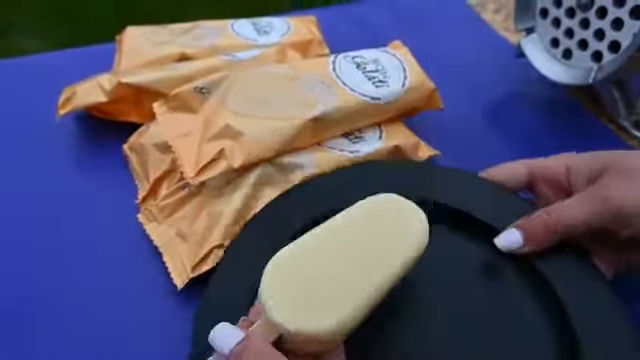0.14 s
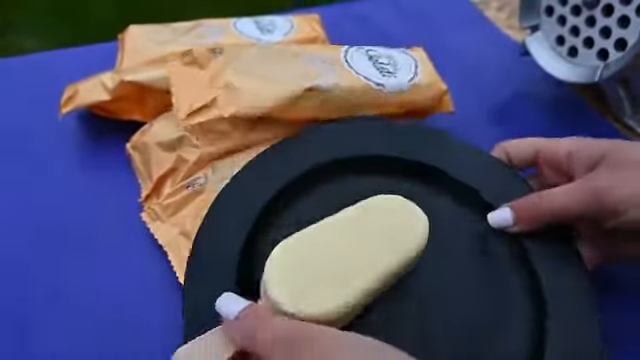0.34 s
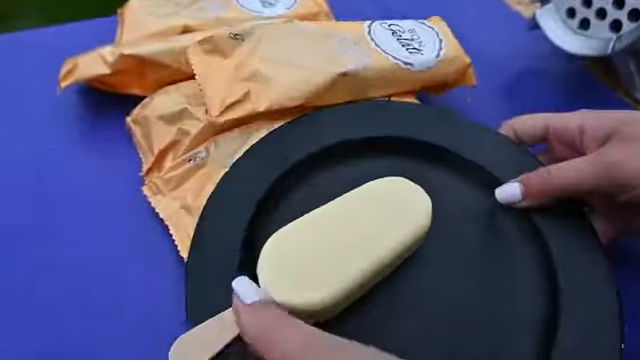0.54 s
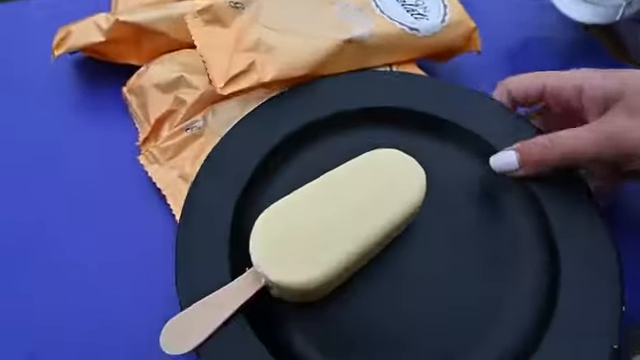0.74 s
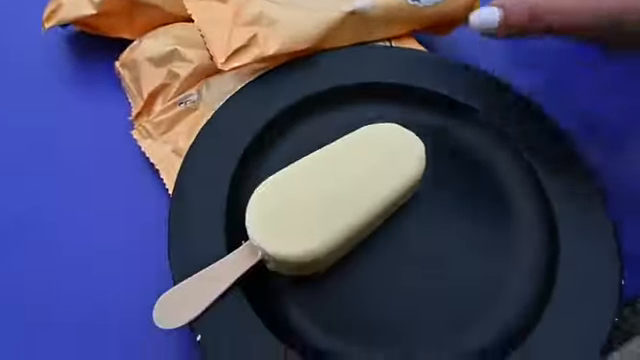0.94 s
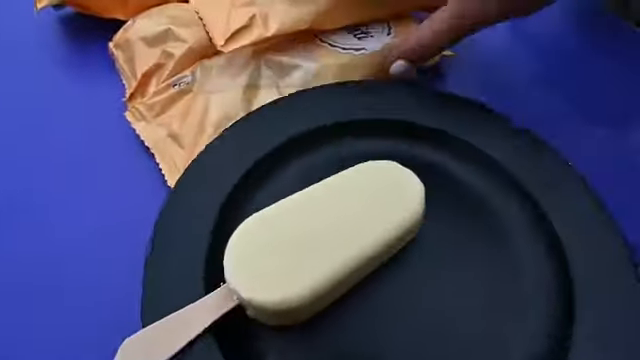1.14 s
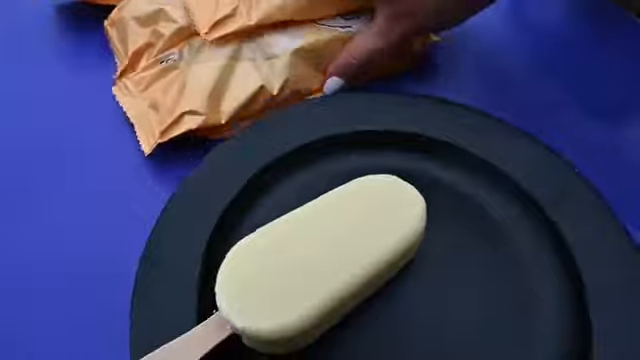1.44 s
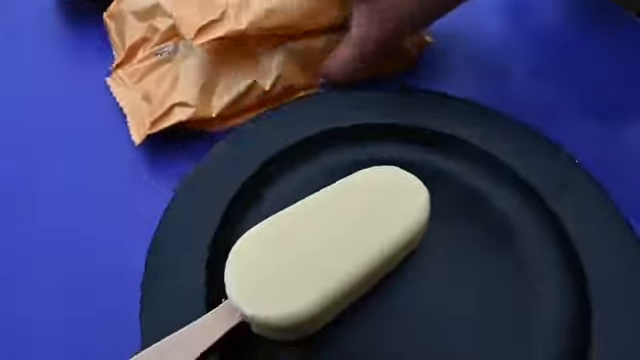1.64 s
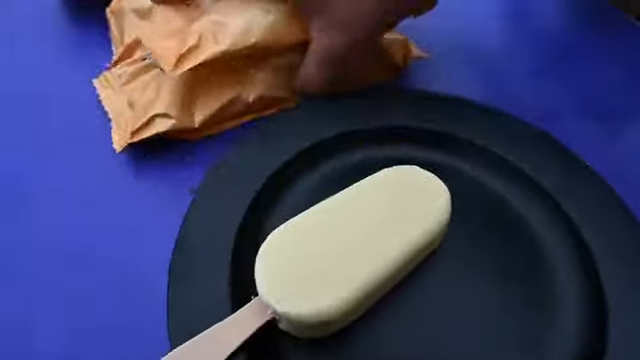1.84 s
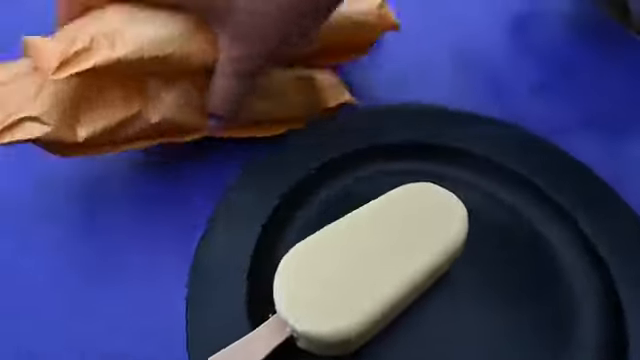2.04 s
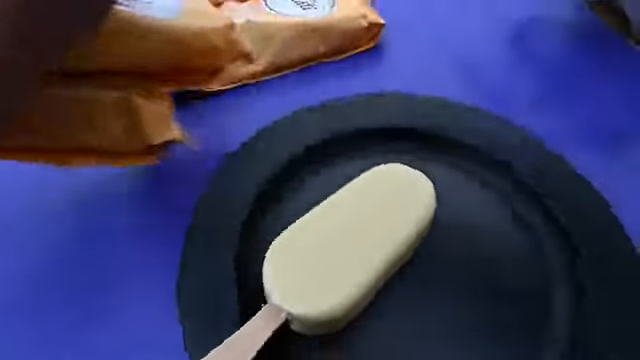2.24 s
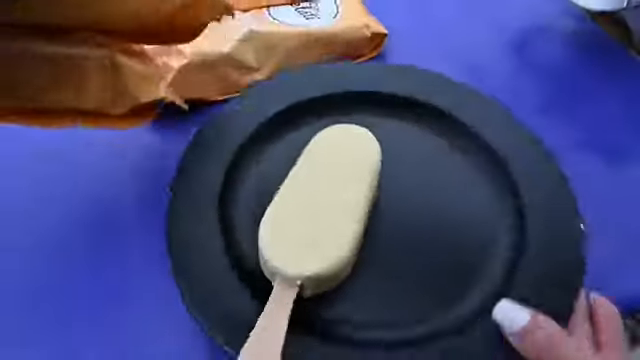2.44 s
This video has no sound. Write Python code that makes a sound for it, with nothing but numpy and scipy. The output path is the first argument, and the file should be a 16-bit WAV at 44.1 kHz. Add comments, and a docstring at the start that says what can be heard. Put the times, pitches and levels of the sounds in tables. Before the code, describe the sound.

Foil wrappers crackle close to a stereo microphone: a soft thud as an ice cream bar meets a plate, a short burst of snaps, a lull, then dense crinkling as a hand gathers them, fading at the end.

```python
"""Ice cream bar set down among foil wrappers

A hand sets an ice cream bar on a plate that slides over foil wrappers, then gathers the wrappers up.
The foil snaps and fizzes (bursts and grains of coloured noise), and air pockets in the wrappers pop hollowly
(short wobbly tones). Plate, table and bar thud (fading sine tones); light wind rumbles (filtered noise)."""
import sys
import numpy as np
from scipy import signal
from scipy.fft import rfft, irfft, next_fast_len
from scipy.io import wavfile
from scipy.ndimage import uniform_filter1d

SR = 44100
rng = np.random.default_rng(int(sys.argv[2]) if len(sys.argv) > 2 else 0)


def generate_wav(sig):
    """Save sig (samples, or channels by samples) to the path in sys.argv[1] as 16-bit PCM at SR."""
    pcm = np.round(np.clip(np.atleast_2d(sig).T, -1, 1) * 32767).astype(np.int16)
    wavfile.write(sys.argv[1], SR, pcm)


N = 114660  # length in samples, 2.6 s

# The general tone of crinkling foil. Each row: frequency in Hz, relative level in dB.
FOIL_TONE = [(180, -57), (300, 0.5), (1100, -1.5), (1480, -4), (3190, -5.5), (3950, -7), (10400, -6),
             (14500, -9), (16000, -30)]
DIFFUSE = 3.8  # for sounds from all around: the left-right likeness is raised to this power


def snaps():
    """Foil creases snap: each swells, ticks and dies as a short noise burst coloured around its centre."""
    # Single snaps. Each row: time in seconds (the tick comes 1.2 ms later), level in dB, colour centre in Hz.
    snap_rows = [(0.1037, -27.5, 6600), (0.2458, -19.5, 3360), (0.2656, -20.5, 5800), (0.311, -19, 3540),
                 (0.3243, -12, 7900), (0.361, -24, 6620), (0.3651, -7.5, 11300), (0.371, -13, 6300),
                 (0.3815, -9, 6950), (0.5025, -17.5, 6000), (0.5256, -30, 4960), (0.5492, -29, 8120),
                 (0.599, -33, 3500), (0.6293, -14, 11100), (0.6359, -17, 6350), (0.9887, -43.5, 11600),
                 (1.2067, -25, 8190), (1.2357, -25, 6060), (1.2833, -26, 3600), (1.2993, -20, 5800),
                 (1.316, -29, 6250), (1.3304, -30, 2530), (1.3478, -19.5, 5850), (1.4288, -14, 10800),
                 (1.454, -23, 5100), (1.4598, -21.5, 8900), (1.4764, -18.5, 5340), (1.4817, -13, 7700),
                 (1.4942, -20, 7990), (1.5121, -13, 2520), (1.5191, -6, 10500), (1.523, -16, 7100),
                 (1.5549, -12.5, 3560), (1.5946, -21, 11100), (1.6065, -9, 3500), (1.623, -14, 6000),
                 (1.6259, -14.5, 5940), (1.6477, -19.5, 4380), (1.6701, -17, 3260), (1.6811, -10, 7400),
                 (1.6838, -22, 3520), (1.7055, -24, 5300), (1.715, -19.5, 8950), (1.7227, -12, 7800),
                 (1.7428, -19, 6800), (1.7716, -11, 5060), (1.7754, -13.5, 2500), (1.7866, -21, 5000),
                 (1.7926, -10, 6000), (1.804, -11, 5340), (1.8089, -9.5, 6100), (1.8242, -21.5, 5400),
                 (1.838, -21.5, 5470), (1.8552, -21, 5130), (1.8608, -18.5, 4000), (1.9442, -19, 3870),
                 (1.9727, -20.5, 3670), (1.9892, -17.5, 5100), (2.0013, -7, 6060), (2.0082, -11.5, 9050),
                 (2.0328, -20, 8100), (2.0534, -21.5, 3180), (2.0805, -10.5, 4920), (2.0948, -19, 4870),
                 (2.1878, -16, 4100), (2.234, -31, 2500), (2.2512, -22.5, 6600), (2.308, -20, 11900),
                 (2.3367, -24.5, 3580), (2.3426, -24, 2180), (2.3671, -23, 6400), (2.5062, -33, 1980),
                 (2.59, -25, 7700)]
    swell_s, swell_db = 0.001, -10  # the swell before the tick
    tick_s, tick_db = 0.0004, 3
    t60, tail_t60, tail_db = 0.015, 0.05, -15  # seconds to fall by 60 dB; the tail is weaker
    ragged_db, ripple_db = 4, 4  # typical unevenness in time and over frequency
    centre_octaves, floor_db, floor_low_hz = 0.52, 4.5, 880  # width of the centre; broad floor under it
    out, lead = np.zeros((2, N)), 512  # lead: samples before the tick
    t = (np.arange(4096) - lead) / SR
    after = np.maximum(t, 0)
    swell = gain_of(swell_db) * np.exp(t / swell_s)
    shape = np.where(t < 0, swell, gain_of(-60 * after / t60))
    shape = shape * (1 + gain_of(tick_db) * np.exp(-abs(t) / tick_s))
    shape = shape + gain_of(tail_db) * fall(after, tail_t60, 0.002)
    for s, db, centre_hz in snap_rows:
        ripple = ripple_db * wander(len(t) // 2 + 1, 60)
        ragged = gain_of(ragged_db * wander(len(t), 30))  # the crease gives way in jerks

        def crease_tone(hz):
            """A broad floor without bass plus a bump at the centre, both in the foil's tone."""
            floor = gain_of(floor_db) * hz ** 2 / (hz ** 2 + floor_low_hz ** 2)
            return gain_of(read(FOIL_TONE, hz) + ripple) * (floor + hump(hz, centre_hz, centre_octaves))

        burst = colour(shape * ragged * rng.standard_normal((2, len(t))), crease_tone)
        # Scale by the strongest 3 ms, leaving room for peaks.
        burst /= np.sqrt(uniform_filter1d(burst ** 2, 130).max(1, keepdims=True) * 5)
        add(out, s + 0.001201 - lead / SR, gain_of(db) * burst)
    return out


def fizz():
    """Countless small creases of differing colour over a smoother rustle."""
    # Colours of the tiny creases: a list of centres in Hz.
    grain_centres = [1300, 2200, 3300, 5000, 7500, 11500]
    grains_per_s, spread_db, grain_t60, grain_octaves = 1600, 4, 0.009, 0.86  # the rate is for all colours together
    smooth_db, flutter_db = -5.5, 0.5
    calm = 0.4  # below 1, the crackle's share changes less than the movement
    t, grains = np.arange(1500) / SR, np.zeros((2, N))
    level = motion(column=1)
    busy = (level / level.max()) ** calm  # slow movement rustles, fast movement crackles
    for centre_hz in grain_centres:
        hits = clicks(grains_per_s / len(grain_centres), spread_db)
        power = signal.oaconvolve(hits ** 2, fall(t, grain_t60, 0.00024) ** 2)[:N]
        noise = evened(np.sqrt(power.clip(0))) * rng.standard_normal((2, N))
        grains = grains + busy * colour(noise, lambda hz: hump(hz, centre_hz, grain_octaves))
    smooth = gain_of(smooth_db) * ports(*rng.standard_normal((2, N)), DIFFUSE)
    foil = ports(*grains) + smooth
    foil = foil * gain_of(flutter_db * busy * wander(N, 300, passes=2))  # clumps
    foil = colour(foil, lambda hz: gain_of(read(FOIL_TONE, hz)))
    # Level out slow changes, then follow the movement.
    return level * foil / np.sqrt(uniform_filter1d((foil ** 2).mean(0), size=4000))


def pops():
    """Trapped air pockets ring for a few cycles, mostly near 1 kHz, with a slightly wobbling phase."""
    # Hollow pops. Each row: start in seconds, level in dB, pitch in Hz.
    pop_rows = [(0.268, -27.5, 1190), (0.314, -7, 1086), (0.327, -20.5, 1187), (0.373, -17, 1000),
                (0.381, -17, 1147), (0.387, -23, 1030), (0.506, -30, 970), (0.528, -31, 1130),
                (0.617, -21, 996), (0.629, -16, 1102), (0.636, -11, 988), (0.644, -17, 965),
                (0.686, -22.5, 915), (0.738, -22.5, 997), (0.748, -29.5, 1010), (0.893, -44, 1070),
                (1.207, -27, 1010), (1.224, -30, 980), (1.236, -19.5, 1183), (1.253, -20, 1380),
                (1.3, -26.5, 1780), (1.555, -18.5, 1020), (1.606, -27, 1025), (1.774, -23.5, 1250),
                (1.805, -23, 1077), (2.003, -21, 1225), (2.036, -26, 1020), (2.252, -25, 770)]
    t60, rise_s, wobble_radians = 0.017, 0.0024, 0.45
    out, t = np.zeros(N), np.arange(3000) / SR
    shape = fall(t, t60, rise_s)
    for s, db, hz in pop_rows:
        wobble = wobble_radians * wander(len(t), 50, passes=2)
        add(out, s, -gain_of(db) * shape / shape.max() * np.sin(2 * np.pi * hz * t + wobble))
    return out


def hollow_rustle():
    """Small air pockets rustle all the while: random clicks through one broad resonance."""
    per_s, spread_db, centre_hz, width_hz = 990, 3, 1140, 420
    rustle = clicks(per_s, spread_db) * rng.standard_normal(N)
    rustle = colour(rustle, lambda hz: 1 / (1 + ((hz - centre_hz) / (.5 * width_hz)) ** 2))
    return motion(column=2) * evened(rustle)


def thuds():
    """Plate and table ring briefly at each contact, as sums of fading tones."""
    # Plate meeting the table. Each row: start in seconds, dull table level in dB, plate ring level in dB.
    thud_rows = [(0.078, -29.5, -28), (0.223, -34, -35.5), (0.316, -27.5, -32), (0.373, -26, -26),
                 (0.511, -50, -36.5), (0.635, -31, -28), (0.686, -31, -40.5), (0.721, -40, -38.5),
                 (1.18, -50, -34), (1.284, -29.5, -31), (1.46, -56, -32.5), (1.52, -64, -35),
                 (1.608, -34, -51), (1.774, -28, -31), (1.899, -43, -41), (2.504, -40, -38.5)]
    # Dull low tones of the table. Each row: frequency in Hz, level in dB, seconds to fall by 60 dB.
    table_tones = [(80, 6, 0.066), (135, 2, 0.09)]
    # Ringing tones of the plate. Each row: frequency in Hz, level in dB, seconds to fall by 60 dB.
    plate_tones = [(240.3, 5, 0.1), (449, -4, 0.068), (595, 2.5, 0.033)]
    out, t = np.zeros(N), np.arange(12000) / SR
    for s, table_db, plate_db in thud_rows:
        table = gain_of(table_db) * ring(table_tones, t)
        add(out, s, table + gain_of(plate_db) * ring(plate_tones, t))
    return out


def bar_landing():
    """The soft bar lands: fading tones with the treble taken off."""
    # Tones of the landing. Each row: frequency in Hz, level in dB, seconds to fall by 60 dB.
    bar_tones = [(211, -3, 0.064), (346, -3, 0.11), (436, 4, 0.13), (627, -1.5, 0.084), (860, 28, 0.0046)]
    start_s, level_db, soft_hz = 0.0755, -23.5, 1700
    out, t = np.zeros(N), np.arange(12000) / SR
    dull = signal.butter(4, soft_hz, fs=SR, output="sos")
    add(out, start_s, gain_of(level_db) * signal.sosfilt(dull, ring(bar_tones, t)))
    return out


def sliding_tone():
    """A low tone sags in pitch as the plate slides."""
    # The slide, one row: start in seconds, length in seconds, first pitch in Hz, last pitch in Hz, level in dB.
    slide = (1.1, 0.24, 309, 230, -39.5)
    s, length, from_hz, to_hz, db = slide
    out = np.zeros(N)
    hz = np.linspace(from_hz, to_hz, round(length * SR))
    tone = np.sin(2 * np.pi * np.cumsum(hz) / SR)
    add(out, s, gain_of(db) * np.sqrt(np.hanning(len(hz))) * tone)  # fades in and out
    return out


def dragging():
    """Plate and table hum faintly while things drag: a narrow band of noise that follows the movement."""
    drag_db, hum_hz, octaves = -39.5, 241, 0.15  # level before the movement scales it down
    hum = colour(rng.standard_normal(N), lambda hz: hump(hz, hum_hz, octaves))
    return gain_of(drag_db) * np.sqrt(motion(column=1)) * evened(hum)


def air():
    """Light wind: noise with a low gusty rumble over a faint hiss."""
    # The tone of the air. Each row: frequency in Hz, relative level in dB.
    air_tone = [(20, 6.5), (45, -7.5), (80, -7), (200, -16), (450, -26), (1000, -43), (2500, -59),
                (15000, -60)]
    level_db, gust_db = -49.5, 1.5  # gust_db: typical swing of the rumble
    noise = colour(rng.standard_normal((2, N)), lambda hz: gain_of(read(air_tone, hz)) * (hz > 15))
    gust = gain_of(gust_db * wander(N, 4000, passes=2))
    low = colour(noise, lambda hz: 1 / (1 + (hz / 200) ** 2))
    return gain_of(level_db) * (noise - low + low * gust) / np.sqrt(np.mean(noise ** 2))


def motion(column):
    """How busily the foil moves, as a gain over time: column 1 for fizz, 2 for hollow rustle."""
    # Levels to glide between. Each row: time in seconds, fizz level in dB, hollow rustle level in dB.
    movement = [(0, -65.5, -70), (0.069, -57, -75), (.1, -42.5, -42), (.2, -47.5, -51.5), (.3, -39, -45),
                (.4, -40, -54), (0.479, -51.5, -52), (0.528, -39.5, -61), (.6, -47.5, -46),
                (.74, -50, -45.5), (.77, -55, -58.5), (.85, -52.5, -65.5), (1.04, -63.5, -72),
                (1.066, -51, -51), (1.177, -48, -52.5), (1.22, -36, -43), (1.35, -37, -49.5),
                (1.369, -44, -55), (1.429, -50.5, -54), (1.46, -33, -56), (1.59, -34, -58),
                (1.62, -26, -36.5), (1.7, -37.5, -63), (1.79, -27, -43), (1.869, -35, -53),
                (2.0, -34.5, -35), (2.13, -36, -50), (2.24, -35, -52), (2.27, -49, -49), (2.37, -46.5, -67),
                (2.4, -53.5, -57.5), (2.6, -50.5, -56)]
    rows = np.array(movement)
    return gain_of(np.interp(np.arange(N) / SR, rows[:, 0], rows[:, column]))


def clicks(per_s, spread_db):
    """Clicks at random moments, mostly small, a few large."""
    size = gain_of(spread_db * np.minimum(rng.exponential(1, N), 4))
    return size * (rng.random(N) < per_s / SR)


def ring(modes, t):
    """A struck body: fading tones, whose levels and pitches differ a little at every blow."""
    total = np.zeros(len(t))
    for hz, db, t60 in modes:
        gain = gain_of(db + 1.5 * rng.standard_normal())
        rise_s = 0.41 / hz
        shape = fall(t, t60, rise_s) * (1 - np.exp(-t / rise_s))  # an extra-soft start
        total += gain * shape * np.sin(2 * np.pi * hz * rng.uniform(0.96, 1.02) * t)
    return total


def fall(t, t60, rise_s):
    """Quick rise, then an exponential fall by 60 dB every t60 seconds."""
    return (1 - np.exp(-t / rise_s)) * gain_of(-60 * t / t60)


def wander(length, size, passes=1):
    """A smoothly wandering random curve of rms 1; size is the smoothing length in points."""
    curve = rng.standard_normal(length)
    for _ in range(passes):
        curve = uniform_filter1d(curve, size)
    return evened(curve)


def hump(hz, centre_hz, octaves):
    """Bell-shaped colour on a log frequency axis."""
    return np.exp(-.5 * (np.log2((hz + 1) / centre_hz) / octaves) ** 2)


def gain_of(db):
    """Turns dB into a gain."""
    return 10 ** (np.asarray(db) / 20)


def evened(x):
    """Scales to rms 1."""
    return x / np.sqrt(np.mean(x ** 2) + 1e-20)


def read(points, hz):
    """Reads a curve between its points on a log frequency axis."""
    f, value = np.transpose(points)
    return np.interp(np.log(hz + 1), np.log(f + 1), value)


def add(mix, s, sound):
    """Mixes a sound in at time s (seconds)."""
    part = mix[..., round(s * SR):][..., :sound.shape[-1]]
    part += sound[..., :part.shape[-1]]


def colour(x, gain):
    """Filters by a gain given as a function of frequency."""
    return irfft(rfft(x) * gain(np.fft.rfftfreq(x.shape[-1], 1 / SR)), x.shape[-1])


def ports(a, b, power=1):
    """Two microphones: alike in the bass, unlike in the treble; a and b are twin versions of one sound."""
    # Left-right likeness. Each row: frequency in Hz, likeness from 0 to 1.
    same = [(30, 0.99), (300, 0.98), (1200, 0.97), (2800, 0.86), (5600, 0.57), (10000, 0.18)]

    def likeness(hz):
        """The likeness at each frequency."""
        return np.clip(read(same, hz), 0, 1) ** power

    mid = colour(a, lambda hz: np.sqrt(.5 + .5 * likeness(hz)))
    side = colour(b, lambda hz: np.sqrt(.5 - .5 * likeness(hz)))
    return np.array([mid + side, mid - side])


def scene():
    """All sources at the two microphones."""
    body = pops() + hollow_rustle() + thuds() + bar_landing() + sliding_tone() + dragging()
    twin = signal.hilbert(body, next_fast_len(N))[:N].imag  # the same sound, a quarter cycle shifted
    return ports(*(snaps() + np.array([body, twin]))) + fizz() + ports(*air(), DIFFUSE)


def record(dry):
    """Soft overload, which mostly rounds off the loudest peaks, then a cut of the highest treble."""
    treble_cut = signal.firwin(255, 15300, window=("kaiser", 8), fs=SR)  # cutoff in Hz
    return signal.oaconvolve(np.tanh(dry), treble_cut[None], "same")


dry = scene()
out = record(dry)
generate_wav(out)
```